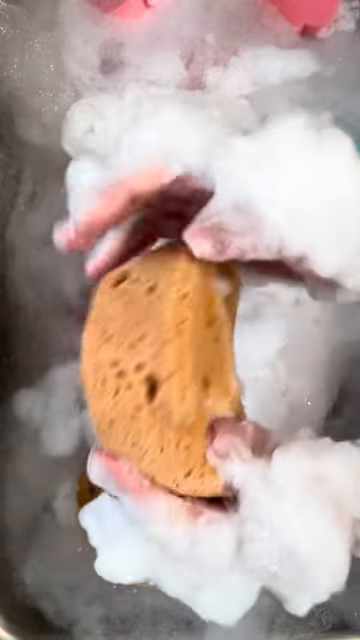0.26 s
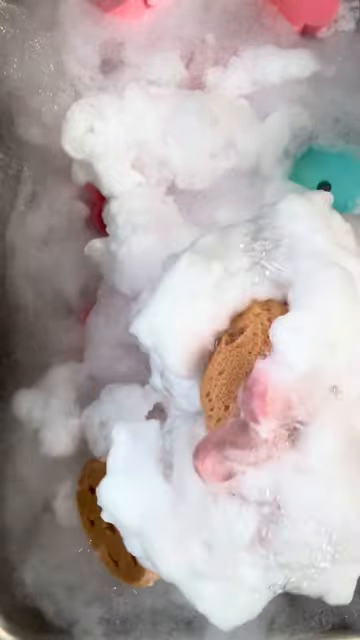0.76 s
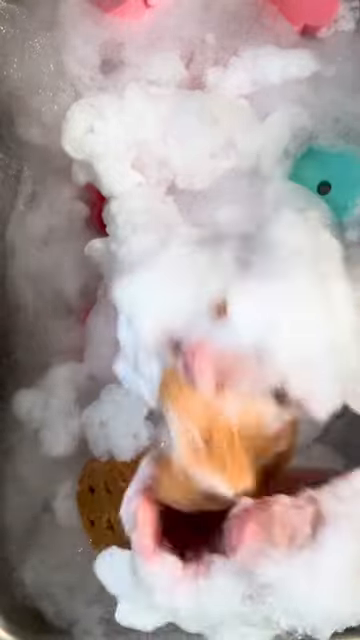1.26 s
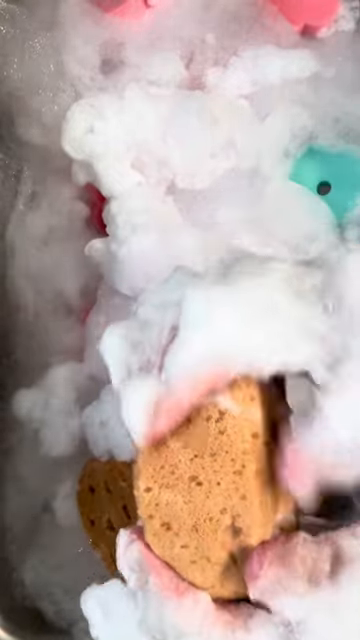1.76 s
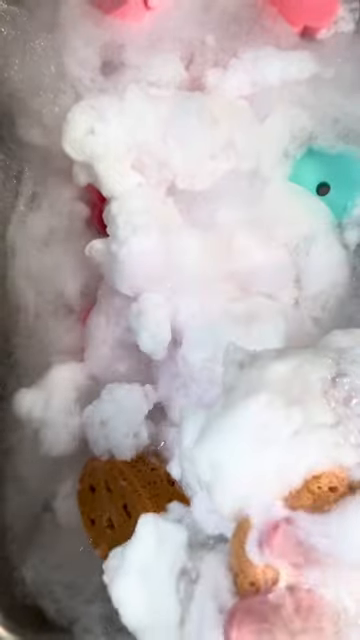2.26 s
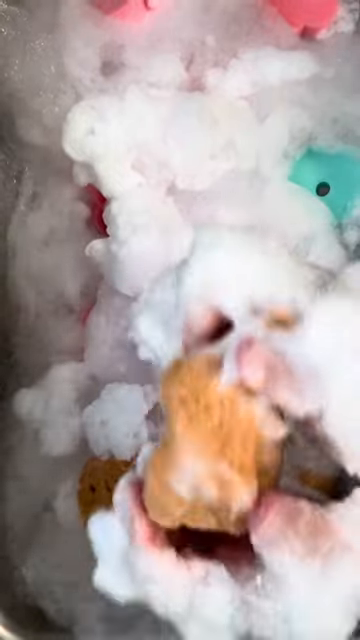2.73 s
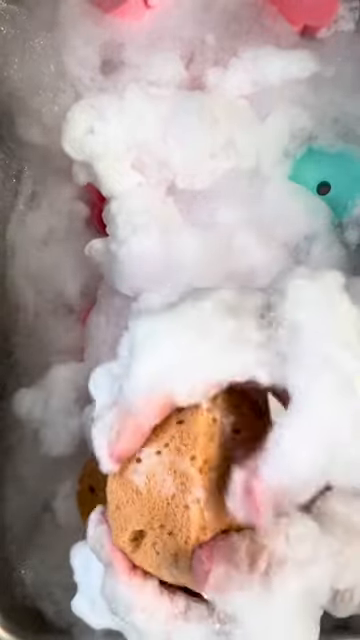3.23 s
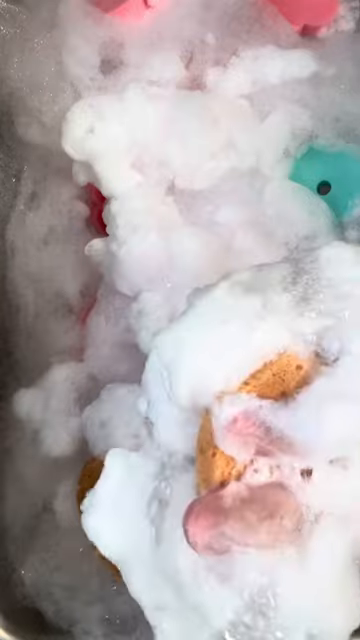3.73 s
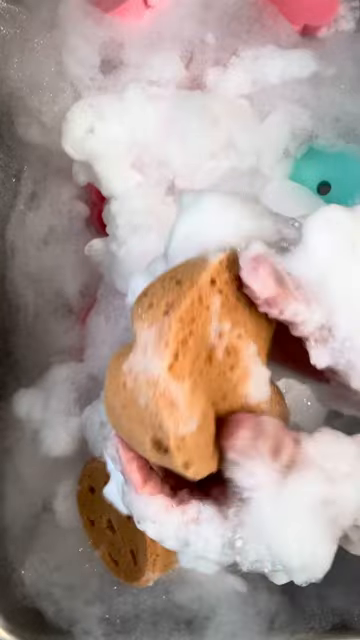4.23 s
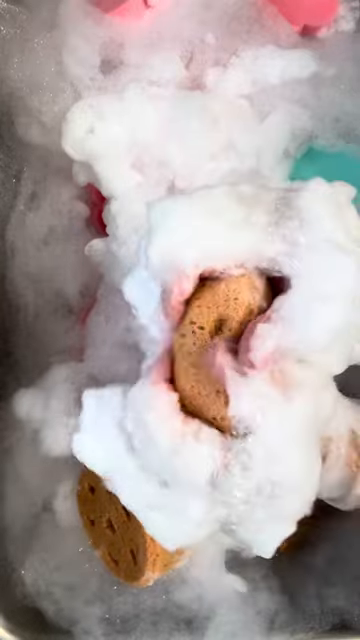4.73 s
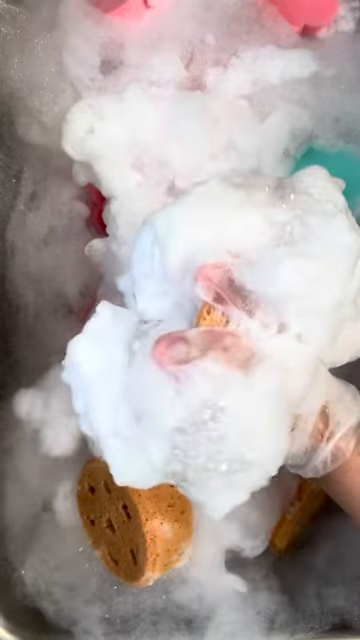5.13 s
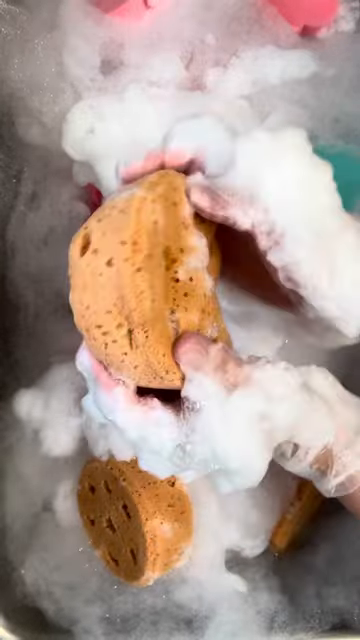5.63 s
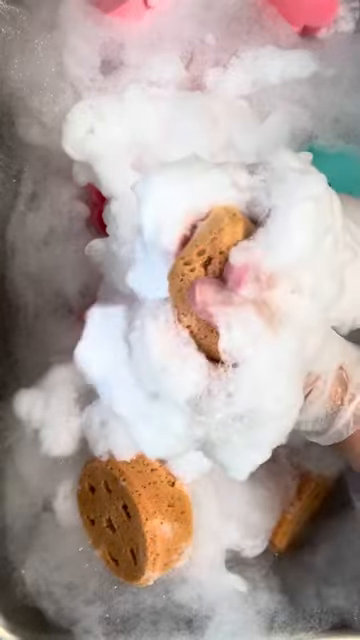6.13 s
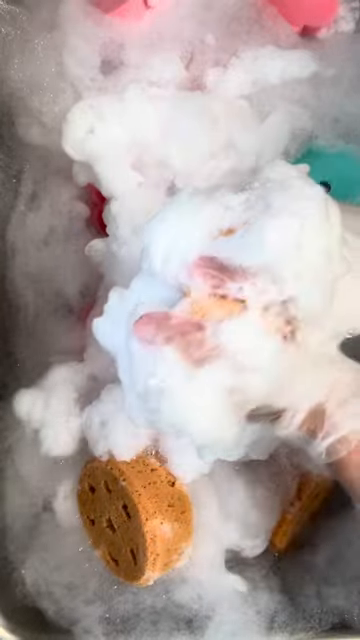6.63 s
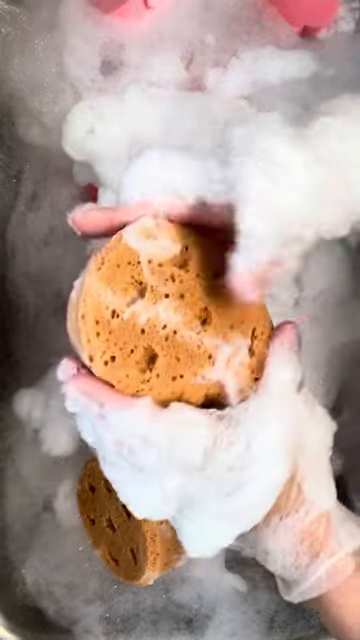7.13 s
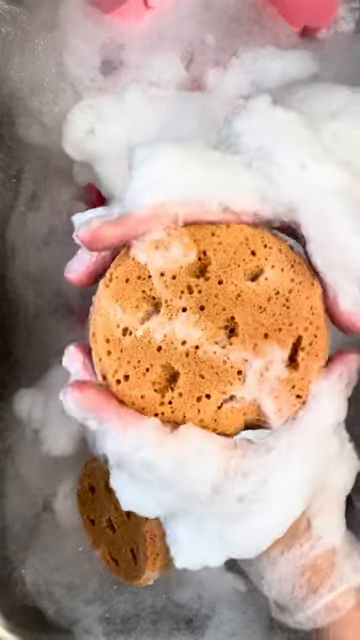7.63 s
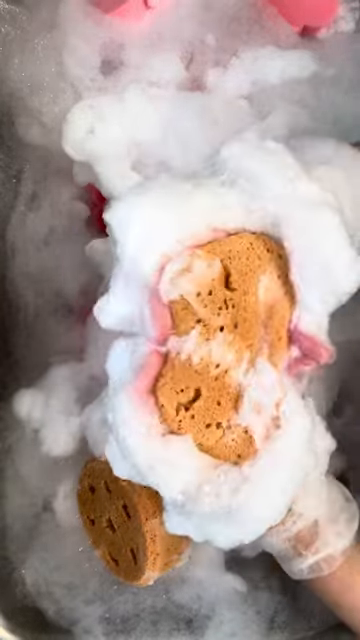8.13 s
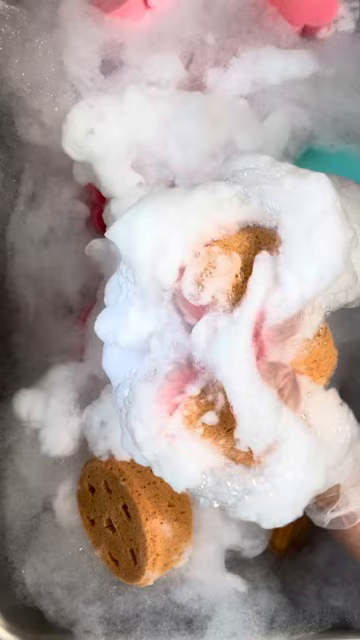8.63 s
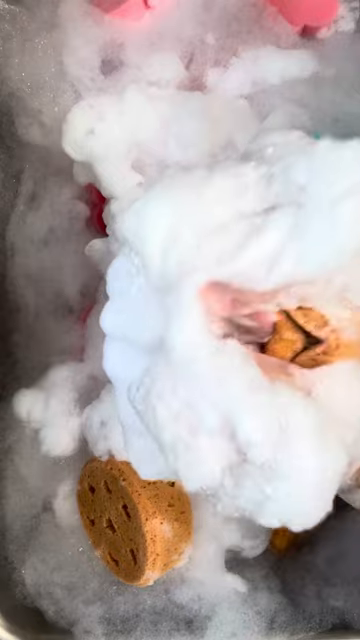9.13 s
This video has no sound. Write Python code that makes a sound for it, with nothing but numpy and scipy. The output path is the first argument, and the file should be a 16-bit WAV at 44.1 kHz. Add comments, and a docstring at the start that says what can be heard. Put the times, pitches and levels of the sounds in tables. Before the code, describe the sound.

Soapy sponge squeezed in hands, miked close in a small, quiet space with tight basin reflections. Wet, crackling squelches come about every second and a half, with slippery finger shifts, small slurps, throaty glugs and popping bubbles between. After a quieter pause, a slow press builds in steps, fizzing, then spluttering with trapped air until the end. Low room rumble and a soft hum that fades in stay underneath.

```python
"""Sponge squeezed over a foamy sink.

Gloved hands squeeze a soapy sponge five times quickly, then once slowly, over a steel sink full of foam.
Suds are dense trains of ringing bubbles in four sizes: gurgle, squelch, fizz, spray; big bubbles pop singly.
The sponge sucks air on release; trapped air puffs out as spatter and thumps, in a run in the last squeeze.
Basin resonances and echoes colour it. A wavering motor hum, fading in at first, lies over a low room rumble.
"""
import sys
import numpy as np
from scipy import signal
from scipy.fft import rfft, irfft, next_fast_len
from scipy.io import wavfile

SR = 44100
rng = np.random.default_rng(int(sys.argv[2]) if len(sys.argv) > 2 else 0)


def waveform_to_disk(signal):
    """Save audio, clipped to [-1, 1], as 16-bit WAV at the path in sys.argv[1]."""
    frames = np.transpose(np.atleast_2d(signal))
    scaled = np.clip(frames, -1, 1) * 32767
    samples = np.round(scaled).astype(np.int16)
    wavfile.write(sys.argv[1], SR, samples)


N = 413658
TIME = np.arange(N) / SR

# motor hum: start_s, level_db [RMS, before waver]
HUM = [(0, -103), (2.3, -58), (2.6, -60), (3.2, -57.5), (3.9, -54.5), (6, -54.5), (8, -53.5), (9.38, -54)]
HUM_HZ = 119.1
# still air of the room: freq_hz, relative_db_per_hz
ROOM_TONE = [(25, -26), (45, -3), (80, 10), (130, -9), (200, -21), (400, -12.5), (1000, -26), (4000, -14),
             (15000, -21)]

# lone ticks of standing foam: freq_hz, relative_db_per_hz
TICKS = [(700, 1), (1500, -10), (3000, -3), (6000, -15)]
TICK_DB, TICKS_PER_S = -70, 130

# bubble populations: freq_hz, relative_db_per_hz
GURGLE = [(60, -9), (90, -8), (140, -1.5), (210, -3), (280, -14), (400, -1.5), (560, -15.5)]
SQUELCH = [(380, -6.5), (550, 0.5), (750, 4), (1000, 3), (1500, 1), (2000, -4), (2700, -13)]
FIZZ = [(1900, 1.5), (2600, -5), (3600, -4.5), (5000, 13), (6500, -36.5), (8500, -37)]
SPRAY = [(6500, -1.5), (8000, 11), (9700, 27), (11500, 14), (14000, -9), (16000, -11)]
# squelch left once loose water has gone: freq_hz, gain_db
DRAINED = [(500, -0.5), (900, -1), (1500, -0.5), (2200, 0)]
# draining starts before the hardest moment; the sponge soaks again at the end
DRAIN_LEAD_S, DRAIN_S, SOAK_S = 0.17, 0.15, 0.12
# left-right difference of edge foam: freq_hz, gain_db [against centre]
WIDTH = [(100, -34), (400, -22), (800, -12), (2100, -10), (2800, -3.5), (3800, -9), (5000, -8), (8000, -14),
         (12000, -11)]
# undisturbed foam, one row: gurgle_db, squelch_db, fizz_db, spray_db [before size trims]
REST_DB = [-60.5, -61, -70.5, -95]

# hollow between cupped hands; level = PALMS_DB + share of squelch dB
PALMS_HZ, PALMS_WANDER_HZ, PALMS_DRIFT_HZ = 2043, 69.8, 45
PALMS_DB, PALMS_FOLLOWS = -21.5, 0.85

# fingers shift hold: centre_s, half_length_s, relative_db, brightness_db [fizz 0, squelch -, spray +]
REGRIPS = [(0.022, 0.063, -3, 1), (0.104, 0.058, -6.5, -9.5), (0.155, 0.036, -5, -0.5),
           (0.26, 0.17, -8.5, 0.5), (0.446, 0.025, -3.5, 1), (1.132, 0.026, -12, -2),
           (1.356, 0.086, -3.5, 0.5), (1.518, 0.11, -4.5, -3.5), (1.747, 0.12, -4.5, 2),
           (2.79, 0.037, -4.5, -2.5), (2.96, 0.059, -6, -4), (3.088, 0.043, -4.5, 6),
           (4.12, 0.045, -1, 1.5), (4.21, 0.077, -8.5, -9), (4.292, 0.044, -1.5, -0.5),
           (4.456, 0.13, -7, -4), (4.6, 0.068, -9.5, 3.5), (5.434, 0.059, -2, 1.5),
           (5.602, 0.072, -3.5, -5), (6.674, 0.083, 3.5, -2.5), (6.953, 0.064, -4, -4),
           (7.029, 0.05, -7.5, -4), (7.204, 0.3, -10.5, -1.5), (7.696, 0.04, -6.5, -7)]
# base levels, one row: squelch_db, fizz_db, spray_db
REGRIP_DB = [-51.5, -50.5, -54.5]
# hands let go, sponge sucks air: start_s, relative_db
RELEASES = [(1.108, -3), (2.52, -2.5), (3.9, -2), (5.19, -4.5), (6.664, -3.5)]
# base levels, one row: squelch_db, fizz_db, spray_db
SUCK_DB = [-45.5, -45, -49.5]
SUCK_S, SUCK_SHARPNESS, REFILL_S, REFILL_DB = 0.11, 4.9, 0.15, -12   # quick gasp, slow faint refill
SLOSH_DB = -14.5   # gurgle against squelch in a release or regrip

# suds slurp through a changing gap: centre_s, half_length_s, level_db, start_pitch_hz, end_pitch_hz
SLURPS = [(0.103, 0.027, -52, 646, 850), (1.206, 0.019, -49.5, 650, 1000), (1.696, 0.012, -65, 600, 720),
          (2.645, .025, -50, 1200, 850), (2.85, 0.041, -50, 1000, 580), (3.699, 0.011, -44, 720, 900),
          (4.012, .022, -50, 1510, 1150), (4.269, 0.031, -54, 620, 850), (5.31, 0.018, -58, 850, 700),
          (5.611, .045, -61, 640, 800), (6.779, .014, -49.5, 850, 1250), (6.945, .014, -55, 740, 860),
          (7.03, .016, -52, 1650, 1300), (7.581, 0.037, -56.5, 600, 740), (8.272, 0.036, -50.5, 560, 720)]
SLURP_WIDTH_HZ, SLURP_BREAKS_PER_S = 260, 800

# quick squeezes: grip_s, build_s [to hardest], fade_s [hardest to wrung out], suds_db [relative],
# wait_s [until water runs], water_db [relative]
SQUEEZES = [(0.478, 0.41, 0.23, 1.5, 0.067, -3.5), (1.74, 0.56, 0.18, -1.5, 0.13, -6),
            (3.158, 0.5, 0.27, -1.3, 0.1, -4), (4.572, 0.4, 0.29, -3, 0.09, -3.5),
            (5.76, 0.61, 0.37, -3, 0.21, -7)]
# response of squelch, fizz, spray (one row each): peak_db, lead_s [ahead of hardest],
# build_db [lower at grip], fade_db [lower when wrung out]
PRESSED = [(-38.5, 0.027, 20.5, 29), (-39, -0.042, 19.5, 22), (-45.5, -0.076, 19.5, 36)]
BUILD_POWER, FADE_POWER = 1.9, 2.43
# loose water runs first and drains before the end
GURGLE_DB, GURGLE_PEAK_S, GURGLE_DRAIN_S, GURGLE_SHARPNESS = -42.5, 0.19, 0.11, 1.67

# wet pockets give way: centre_s, half_length_s, squelch_db [before GUSH_DB]
GUSHES = [(0.62, 0.062, -46), (0.786, 0.071, -33.5), (2.028, 0.061, -43), (2.208, 0.062, -34.5),
          (3.472, 0.14, -38.5), (4.01, 0.024, -46), (4.72, 0.041, -54), (4.822, 0.048, -42),
          (4.958, 0.03, -41), (5.283, 0.047, -51), (6.155, 0.036, -39), (6.58, 0.06, -49),
          (6.75, 0.045, -44)]
# offsets, one row: gurgle_db, squelch_db, fizz_db, spray_db
GUSH_DB = [-11.5, -0.5, -16, -40]

# trapped air pockets boom: centre_s, half_length_s, level_db [RMS, before roughness], mean_pitch_hz
GLUGS = [(0.7, .04, -45, 206.7), (0.982, 0.044, -45, 138), (2.029, 0.034, -42, 210),
         (2.362, 0.048, -45.5, 140), (3.283, 0.022, -46.5, 160.4), (3.414, .05, -43, 200),
         (3.48, 0.043, -43.5, 335.6), (3.526, 0.039, -48, 133), (4.812, 0.023, -43.5, 225),
         (6.16, 0.038, -43.5, 329), (6.173, .04, -44.5, 214.4), (6.295, .035, -41, 140.2),
         (6.456, 0.06, -45.5, 139.4), (8.62, .04, -45, 140.2), (8.767, 0.091, -45, 136.6),
         (8.82, .2, -48, 334), (9.003, 0.043, -42, 221), (9.146, 0.062, -38.5, 139.8)]
GLUG_WOBBLE, GLUG_ROUGH_DB = .07, 1.5   # spread of pitch (share) and of level

# biggest bubbles bursting: start_s, relative_db, final_pitch_hz, swell_s [short ticks, long bloops]
POPS = [(0.766, -28, 577, 0.0017), (0.791, -27, 620, 0.0015), (0.809, -30, 655, 0.0028),
        (0.831, -27, 695, 0.0016), (0.863, -20, 860, 0.00063), (0.873, -23.5, 694, 0.0023),
        (0.879, -25, 620, 0.00071), (0.89, -31, 585, 0.0013), (0.914, -31, 605, 0.0023),
        (0.935, -30, 636, 0.0016), (2.19, -24, 1110, 0.00081), (2.215, -28, 1900, 0.0012),
        (2.235, -27, 630, 0.0013), (2.251, -29, 574, 0.0028), (2.308, -33, 1100, 0.0025),
        (2.3505, -17, 730, 0.0014), (2.471, -34.5, 1870, 0.00081), (2.844, -41.5, 600, 0.0049),
        (2.871, -46, 576, 0.0018), (3.467, -35, 750, 0.0014), (3.481, -33, 580, 0.0019),
        (3.498, -31, 600, 0.0014), (3.51, -31, 800, 0.00074), (3.519, -40, 700, .0008),
        (3.535, -32, 766, 0.002), (3.575, -29, 617, 0.0013), (3.603, -28, 1480, .0012),
        (3.612, -28, 800, .001), (3.648, -33, 1410, 0.0014), (3.684, -22, 635, 0.0014),
        (4.023, -36, 666, .0025), (4.896, -30, 640, 0.0016), (4.945, -30, 660, 0.0015),
        (4.953, -28, 950, 0.0012), (4.963, -25, 680, 0.0013), (4.9985, -22, 680, 0.0011),
        (5.02, -25, 690, 0.0018), (6.161, -31, 1130, 0.0013), (6.17, -25.5, 1000, 0.001),
        (6.183, -33, 850, 0.00076), (6.228, -30, 1210, 0.0013), (6.269, -30.5, 1360, 0.002),
        (6.351, -33, 1500, 0.00077), (6.41, -30, 1140, 0.0015), (6.421, -30, 770, 0.0018),
        (6.556, -39, 646, 0.00098), (6.611, -31, 760, 0.0012), (6.648, -26, 1710, 0.00092),
        (6.651, -39, 597, 0.00092), (6.675, -34, 724, .0022), (6.701, -30, 610, 0.0014),
        (6.712, -34, 710, 0.0019), (6.721, -41, 675, 0.0014), (6.762, -36, 646, .001),
        (6.785, -38, 680, 0.0022), (7.886, -41.5, 620, 0.0023), (8.464, -31, 640, 0.0013),
        (8.641, -42, 619, 0.002), (8.675, -38, 690, 0.0018), (8.71, -38, 1180, .001),
        (9.008, -28.5, 644, 0.0014), (9.202, -28, 520, .0012)]
# crack of a tearing film: freq_hz, relative_db_per_hz
SNAP = [(120, -22), (350, -5), (1200, -1), (2200, 0), (3500, -24), (8000, -26)]
# lesser bubbles burst at random, louder with the squelch
STRAY_POPS_PER_S, STRAY_LOW_HZ, STRAY_HIGH_HZ = 45, 530, 1730
STRAY_OVER_SQUELCH_DB, STRAY_SPREAD_DB, STRAY_SWELL_S = -0.5, 1.5, .001

# air puffs through suds: start_s, spatter_db [relative], thump_db [relative]
PUFFS = [(2.463, -27.5, -70), (6.499, -23, -45), (6.554, -24, -40.5), (6.61, -28, -41), (6.648, -29, -41),
         (8.461, -22.5, -42), (8.529, -37, -56), (8.553, -31, -41), (8.594, -30.5, -34),
         (8.64, -29.5, -35.5), (8.673, -28, -33), (8.709, -28.5, -33), (8.73, -30, -35), (8.748, -28, -33),
         (8.764, -30, -41), (8.793, -30, -40), (8.809, -35, -45), (8.824, -27.5, -43), (8.838, -30, -37),
         (8.856, -28, -38), (8.871, -27, -38), (8.889, -24, -35), (8.907, -27.5, -31), (8.93, -25, -32),
         (8.957, -24, -28.5), (8.982, -27, -29), (9.005, -26.5, -30), (9.029, -23, -33),
         (9.056, -23.5, -28), (9.081, -25, -28.5), (9.105, -23.5, -37), (9.143, -18, -35),
         (9.199, -19, -26), (9.242, -21, -34), (9.28, -26, -34.5), (9.331, -25.5, -39)]
# grains of a puff: freq_hz, relative_db_per_hz
SPATTER = [(350, 1), (650, 0), (1100, 6), (2000, 1), (3000, -1.5), (5000, -5.5), (8000, -39), (14000, -15)]
PUFF_RISE_S = 0.0023
COARSE_HZ, COARSE_LAG_S = 1000, 0.0013   # coarse grains follow fine ones
THUMP_OVERSHOOT, THUMP_GLIDE_S = 1.7, 0.002   # starts high, falls onto pitch
SHOVE_DB, SHOVE_S = -8, 0.0053   # one soft, deep push of escaping air

# soft nudges against the basin: start_s, peak_db
NUDGES = [(2.83, -44.5), (4.11, -46)]

# last squeeze, two pushes: time_s, gurgle_db, squelch_db, fizz_db, spray_db [before size trims]
SLOW_SQUEEZE = [(7.62, -64, -73, -68, -70), (7.87, -57, -52, -52.5, -58.5), (8.0, -59, -51, -51, -53),
                (8.25, -51.5, -48.5, -48.5, -49), (8.4, -62, -55, -48.5, -50),
                (8.48, -49, -46.5, -45.5, -49.5), (8.62, -55, -52, -47.5, -51.5),
                (8.76, -50, -44, -45.5, -51.5), (9.04, -51, -44.5, -45.5, -54),
                (9.27, -49.5, -45, -44, -54.5), (9.38, -56, -49.5, -63, -67)]

# basin resonances and one hollow: freq_hz, width_hz, gain_db
BASIN = [(84.3, 7.5, 13.5), (137, 9.4, 9), (233.6, 42, 7), (329, 19, 7), (415, 4.1, 4.5), (564, 127, 5.5),
         (685, 40, 5), (776, 22, 5.5), (1004, 26, 5.5), (1145, 56, 4.5), (1363, 40, 5), (1490, 26, 2.5),
         (1720, 50, 3), (1923, 120, 4.5), (2100, 21, 4), (2215, 21, 7.5), (2243, 70, -13), (3860, 40, 3)]
WALL_ECHO_S, WALL_ECHO_DB = .0054, -17
# reflected against direct sound: freq_hz, gain_db
REFLECTED = [(100, -24), (300, -19), (700, -15), (2000, -15), (4000, -13), (15000, -12)]
# phase between channels: freq_hz, left_lead_rad
PORT_PHASE = [(0, 0), (800, .15), (1500, 0), (4100, -.25), (5200, -1.05), (6300, -1.8), (7300, -2.9),
              (8500, -3.4), (9400, -4.2), (10500, -5.1), (11400, -6.1), (12700, -6.5), (14000, -7.9),
              (15200, -9.4)]
CUTOFF_HZ = 15100


def from_db(db):
    """Decibels to gain."""
    return 10 ** (np.asarray(db) / 20)


def power(db):
    """Decibels to power; separate flows add in power."""
    return from_db(db) ** 2


def rms_one(x):
    """Scale to unit power."""
    return x / np.sqrt(np.mean(x ** 2) + 1e-20)


def in_time(rows):
    """Interpolate each column of a curve to one value per sample."""
    s, *columns = np.transpose(rows)
    return [np.interp(TIME, s, c) for c in columns]


def at_hz(points, hz):
    """Read a spectrum on a log-frequency axis."""
    f, value = np.transpose(points)
    return np.interp(np.log(np.maximum(hz, 1)), np.log(f), value)


def coloured(x, spectrum):
    """Filter by a dB spectrum."""
    length = x.shape[-1]
    size = next_fast_len(length, True)
    gain = from_db(at_hz(spectrum, np.fft.rfftfreq(size, 1 / SR)))
    return irfft(rfft(x, size) * gain, size)[..., :length]


def drift(corner_hz):
    """Noise through two equal lowpass poles, made at SR / 20; spread about 1."""
    r = np.exp(-40 * np.pi * corner_hz / SR)
    noise = rng.standard_normal(N // 20 + 2002)
    slow = signal.lfilter([1], [1, -2 * r, r * r], noise)[2000:]   # drop filter start-up
    return np.interp(np.arange(N) / 20, np.arange(len(slow)), rms_one(slow))


def add(out, s, sound):
    """Mix a short sound in at time s."""
    start = max(round(s * SR), 0)
    out[start:start + len(sound)] += sound[:max(N - start, 0)]


def swell(t, peak_s):
    """Envelope that rises to 1 at peak_s and dies away."""
    u = np.maximum(t, 0) / peak_s
    return u * np.exp(1 - u)


def hump(half_s):
    """Power of a brief Gaussian swell centred in one second."""
    return np.exp(-2 * ((np.arange(SR) / SR - .5) / half_s) ** 2)


def swells(rows):
    """Power per bubble size from rows: centre_s, half_length_s, levels_db."""
    out = np.zeros((len(rows[0][2]), N + 2 * SR))
    for s, half_s, db in rows:
        start = max(round(s * SR), 0)
        out[:, start:start + SR] += power(db)[:, None] * hump(half_s)
    return out[:, SR // 2:SR // 2 + N]


def bubbles(spectrum, per_s, spread_db, octaves, count=9):
    """Films break at random, each ringing its size class's band; unit power overall."""
    out = np.zeros(N)
    for hz in np.geomspace(spectrum[0][0], spectrum[-1][0], count):
        draws = rng.random((N // 10, 3))[:int(per_s / count * N / SR)]
        when, size, sign = draws.T
        strength = from_db(spread_db * np.minimum(-np.log(1 - size), 4)) * np.sign(sign - .5)
        clicks = np.bincount((when * N).astype(int), strength, N)
        edges_hz = [hz / 2 ** (octaves / 2), min(hz * 2 ** (octaves / 2), .45 * SR)]
        band = signal.butter(2, edges_hz, "band", fs=SR, output="sos")
        ring = signal.sosfilt(band, clicks + 1e-18)
        # sqrt(hz): log-spaced bands, spectrum per Hz
        out += rms_one(ring) * np.sqrt(hz) * from_db(at_hz(spectrum, hz))
    return rms_one(out)


def room(tone_db=-57.5, waver_db=2.5, idle_db=-2.0):
    """Wavering motor hum over a low noise rumble, which is lighter until the motor runs."""
    hum_db, = in_time(HUM)
    hum_gain = from_db(hum_db + waver_db * drift(22.0))
    hum = hum_gain * np.sqrt(2) * np.sin(2 * np.pi * HUM_HZ * TIME + 0.37 * drift(8.9))
    idle = np.clip((HUM[1][1] - hum_db) / 10, 0, 1)
    rumble = rms_one(coloured(rng.standard_normal(N), ROOM_TONE))
    return hum + from_db(tone_db + idle_db * idle) * rumble


def ticks():
    """Single films of standing foam break with tiny ticks."""
    return from_db(TICK_DB) * bubbles(TICKS, per_s=TICKS_PER_S, spread_db=3.0, octaves=0.68, count=6)


def drained():
    """How far the sponge has lost its loose water, 0-1."""
    out = np.zeros(N)
    for grip_s, build_s, fade_s, *_ in SQUEEZES:
        t = TIME - grip_s - build_s
        draining = (t + DRAIN_LEAD_S) / DRAIN_S
        soaking = (fade_s - t) / SOAK_S
        out += np.clip(np.minimum(draining, soaking), 0, 1)
    return out


def foam(gurgle_db, squelch_db, fizz_db, spray_db):
    """Four bubble sizes, deep gurgle to finest spray; squelch changes colour as the sponge drains."""
    gurgle = from_db(gurgle_db - 3.5) * bubbles(GURGLE, per_s=2000, spread_db=0.5, octaves=0.89, count=6)
    squelch = from_db(squelch_db - 3.0) * bubbles(SQUELCH, per_s=3600, spread_db=1.0, octaves=1.35, count=7)
    squelch = squelch + drained() * (coloured(squelch, DRAINED) - squelch)
    fizz = from_db(fizz_db) * bubbles(FIZZ, per_s=15000, spread_db=0.4, octaves=1.2, count=5)
    spray = from_db(spray_db + 1.5) * bubbles(SPRAY, per_s=12000, spread_db=3.0, octaves=1.0, count=4)
    return gurgle + squelch + fizz + spray


def suds(levels_db, clump_db=1.02, clump_hz=40, gulp_db=1.0, gulp_hz=16):
    """Suds leave the pores in shared spurts, between the palms (mid) and at the edges (side)."""
    gurgle_db, squelch_db, fizz_db, spray_db = levels_db
    spurts = from_db(clump_db * drift(clump_hz))
    gulps = gulp_db * drift(gulp_hz)   # large bubbles only
    centre = foam(gurgle_db + gulps, squelch_db + gulps, fizz_db, spray_db)
    edges = foam(gurgle_db + gulps, squelch_db + gulps, fizz_db, spray_db)
    return spurts * (centre + coloured(edges, WIDTH) * np.array([[1], [-1]]))


def palms(squelch_db):
    """Suds ring the hollow between the hands: noise-modulated tone, pitch wandering with the grip."""
    turn = 2 * np.pi * np.cumsum(PALMS_HZ + PALMS_WANDER_HZ * drift(4)) / SR
    ringing = drift(PALMS_DRIFT_HZ) * np.cos(turn) + drift(PALMS_DRIFT_HZ) * np.sin(turn)
    return from_db(PALMS_DB + PALMS_FOLLOWS * squelch_db) * ringing


def handling():
    """Power of the four sizes as fingers find a new hold and the released sponge sucks air and refills."""
    fineness, t = np.array([-1, 0, 1]), np.arange(2 * SR) / SR
    regrips = [(s, half_s, REGRIP_DB + fineness * bright_db + db) for s, half_s, db, bright_db in REGRIPS]
    out = swells(regrips)
    gasp = swell(t, SUCK_S) ** (2 * SUCK_SHARPNESS)
    refill = power(REFILL_DB) * swell(t, REFILL_S) ** 2
    for size, suck_db in enumerate(SUCK_DB):
        for s, db in RELEASES:
            add(out[size], s, power(suck_db + db) * (gasp + refill))
    gurgle = power(SLOSH_DB) * out[0]
    return np.vstack([gurgle, out])


def slurps():
    """Films break in a narrow gap and ring its cavity; pitch slides as the gap changes."""
    out, t = np.zeros(N), np.arange(SR // 4) / SR - 1 / 8
    decay = np.exp(-np.pi * SLURP_WIDTH_HZ / SR)
    for s, half_s, db, start_hz, end_hz in SLURPS:
        hz = start_hz + (end_hz - start_hz) * (1 + np.tanh(t / half_s)) / 2
        turn = np.exp(2j * np.pi * np.cumsum(hz) / SR)
        breaks = (rng.random(len(t)) < SLURP_BREAKS_PER_S / SR) * rng.choice([-1, 1], len(t))
        # resonator in a frame that turns with the pitch
        ring = (turn * signal.lfilter([1], [1, -decay], breaks / turn)).real
        shape = np.exp(-(t / half_s) ** 2)
        sound = from_db(db) * rms_one(ring * shape) * np.sqrt(np.mean(shape ** 2))
        add(out, s + t[0], sound[s + t >= 0])
    return out


def squeezes():
    """Power of the four sizes as the hands close: water first, then ever finer foam."""
    out = np.zeros((4, N))
    for grip_s, build_s, fade_s, suds_db, wait_s, water_db in SQUEEZES:
        hardest_s = grip_s + build_s
        end_s, water_s = hardest_s + fade_s, grip_s + wait_s
        near = (TIME > grip_s - .5) & (TIME < end_s + .5)
        t = TIME[near]
        water_left = np.clip((end_s - t) / GURGLE_DRAIN_S, 0, 1)
        water = swell(t - water_s, GURGLE_PEAK_S) ** GURGLE_SHARPNESS * water_left
        out[0, near] += power(GURGLE_DB + water_db) * water ** 2
        for size, (peak_db, lead_s, build_db, fade_db) in enumerate(PRESSED, 1):
            peak_s = hardest_s - lead_s
            before = np.maximum((peak_s - t) / (peak_s - grip_s), 0)
            after = np.clip((t - peak_s) / (end_s - peak_s), 0, 2)
            lower_db = build_db * before ** BUILD_POWER + fade_db * after ** FADE_POWER
            out[size, near] += power(peak_db + suds_db - lower_db)
    return out


def gushes():
    """Power of the four sizes where wet pockets give way under the grip."""
    return swells([(s, half_s, np.add(GUSH_DB, db)) for s, half_s, db in GUSHES])


def glugs():
    """Water wells through the fingers; each trapped air pocket booms as a wobbling, throaty sine."""
    out = np.zeros(N)
    stretched_s = np.cumsum(1 + GLUG_WOBBLE * drift(35.07)) / SR   # wobbling clock
    for (s, half_s, db, hz), turn in zip(GLUGS, rng.random(len(GLUGS))):
        near = np.abs(TIME - s) < 3 * half_s
        shape = np.exp(-((TIME[near] - s) / half_s) ** 2)
        out[near] += from_db(db) * shape * np.sin(2 * np.pi * (hz * stretched_s[near] + turn))
    return np.sqrt(2) * out * from_db(GLUG_ROUGH_DB * drift(50))


def stray_pops(squelch_db):
    """Random lesser bubbles as pop rows: start_s, relative_db, final_pitch_hz, swell_s."""
    draws = rng.random((2000, 4))[:int(STRAY_POPS_PER_S * N / SR)]
    when, size, pitch, length = draws.T
    start_s = when * N / SR
    db = np.interp(start_s, TIME, squelch_db) + STRAY_OVER_SQUELCH_DB + STRAY_SPREAD_DB * (2 * size - 1)
    hz = STRAY_LOW_HZ * (STRAY_HIGH_HZ / STRAY_LOW_HZ) ** pitch
    return list(zip(start_s, db, hz, STRAY_SWELL_S * (.5 + length)))


def pops(bursts, level_db=-2.5, glide_s=0.00068, overshoot=2.07, snap_s=0.00085, snap_db=-9.0):
    """A big bubble tears: a noise snap of the film, and a short blip falling onto its pitch."""
    out, t = np.zeros(N), np.arange(SR // 30) / SR
    noise = rms_one(coloured(rng.standard_normal((len(bursts), len(t))), SNAP))
    snaps = noise * swell(t, snap_s) * from_db(snap_db)
    falling_s = t + overshoot * glide_s * (1 - np.exp(-t / glide_s))
    for (s, db, hz, swell_s), snap, turn in zip(bursts, snaps, rng.random(len(bursts))):
        blip = swell(t, swell_s) ** 2 * np.sin(2 * np.pi * (hz * falling_s + turn))
        add(out, s, from_db(db + level_db) * (snap + blip))
    return out


def puffs(escapes, spatter_db=-10.0, thump_db=-1.0, thump_hz=130, thump_s=0.0023, lag_s=0.00785,
          pocket_hz=325, pocket_db=-10.0, pocket_s=0.0029):
    """Air spatters the suds; then the foam flap thumps shut and the pocket between the palms rings."""
    spatter, low, t = np.zeros(N), np.zeros(N), np.arange(SR // 12) / SR
    falling_s = t + THUMP_OVERSHOOT * THUMP_GLIDE_S * (1 - np.exp(-t / THUMP_GLIDE_S))
    shove = from_db(SHOVE_DB) * swell(t, SHOVE_S) ** 2
    for (s, peak_db, low_db), (size, hollow) in zip(escapes, rng.uniform(-1, 1, (len(escapes), 2))):
        add(spatter, s, from_db(peak_db + spatter_db) * swell(t, PUFF_RISE_S))
        flap_hz = thump_hz * np.exp(0.19 * size)
        hollow_hz = pocket_hz * np.exp(0.039 * hollow)
        thump = from_db(thump_db) * swell(t, thump_s) * np.sin(2 * np.pi * flap_hz * falling_s)
        pocket = from_db(pocket_db) * swell(t, pocket_s) * np.sin(2 * np.pi * hollow_hz * t)
        add(low, s + lag_s, from_db(low_db) * (thump + pocket + shove))
    # so small a pocket has no deep bass
    sealed = signal.sosfilt(signal.butter(2, 75, "high", fs=SR, output="sos"), low)
    grains = bubbles(SPATTER, per_s=20000, spread_db=1.5, octaves=1.38, count=8)
    coarse = signal.sosfiltfilt(signal.butter(2, COARSE_HZ, fs=SR, output="sos"), grains)
    late = np.interp(TIME - COARSE_LAG_S, TIME, spatter)
    return spatter * (grains - coarse) + late * coarse + sealed


def pressure(escapes, drop=0.092, recover_s=0.0071):
    """Each puff vents the sponge, so the suds sag briefly: gain exp(-drop), deepest at recover_s."""
    lost, t = np.zeros(N), np.arange(SR // 8) / SR
    for s, *_ in escapes:
        add(lost, s, drop * swell(t, recover_s))
    return np.exp(-lost)


def nudges(floor_hz=50, peak_s=0.014):
    """Basin floor gives a dull, deep wobble: a swelling sine."""
    out, t = np.zeros(N), np.arange(SR // 3) / SR
    for s, db in NUDGES:
        add(out, s, from_db(db) * swell(t, peak_s) * np.sin(2 * np.pi * floor_hz * t))
    return out


def slow_squeeze():
    """Power of the four sizes in the last, slow squeeze."""
    return power(in_time(SLOW_SQUEEZE)) * (TIME > SLOW_SQUEEZE[0][0])


def flow():
    """Levels in dB of gurgle, squelch, fizz and spray: foam at rest plus all the hands do."""
    rest = power(REST_DB)[:, None]
    return 10 * np.log10(rest + squeezes() + gushes() + handling() + slow_squeeze())


def basin(x):
    """Standing waves between the sink walls, as a chain of peaks and one dip."""
    for hz, width_hz, db in BASIN:
        b, a = signal.iirpeak(hz, hz / width_hz, fs=SR)
        x = x + (from_db(db) - 1) * signal.lfilter(b, a, x)
    return x


def wall_echo(x):
    """One hard wall nearby returns a delayed copy."""
    delayed = np.pad(x, ((0, 0), (round(WALL_ECHO_S * SR), 0)))[:, :N]
    return x + from_db(WALL_ECHO_DB) * delayed


def reflections(x, t60_s=.09):
    """Faint sink-wall echoes: decaying noise, different in each channel."""
    t = np.arange(SR // 8) / SR
    echoes = rng.standard_normal((2, len(t))) * from_db(-60 * t / t60_s) * (t > .002)
    echoes = echoes / np.sqrt(np.sum(echoes ** 2, axis=1, keepdims=True))
    return x + coloured(signal.fftconvolve(x, echoes, axes=1)[:, :N], REFLECTED)


def scene():
    """Sponge sounds in the basin, slightly left of centre, with nudges and room around them."""
    left_db = .22
    levels_db = flow()
    squelch_db = levels_db[1]
    bursts = list(POPS) + stray_pops(squelch_db + drained() * DRAINED[1][1])
    wet = pressure(PUFFS) * suds(levels_db) + puffs(PUFFS) + pops(bursts)
    wet = wet + slurps() + ticks() + palms(squelch_db)
    sponge = reflections(wall_echo(basin(wet)) + glugs())   # glugs bypass the basin resonances
    return sponge * from_db([[left_db], [-left_db]]) + nudges() + room()


def record(dry):
    """Channels drift out of phase in the treble; a steep lowpass cuts the top."""
    phase_rad = np.interp(np.fft.rfftfreq(N, 1 / SR), *np.transpose(PORT_PHASE))
    ports = irfft(rfft(dry) * np.exp(.5j * phase_rad * np.array([[1], [-1]])), N)
    return signal.sosfilt(signal.ellip(10, .2, 80, CUTOFF_HZ, fs=SR, output="sos"), ports)


dry = scene()
out = record(dry)
waveform_to_disk(out)
```